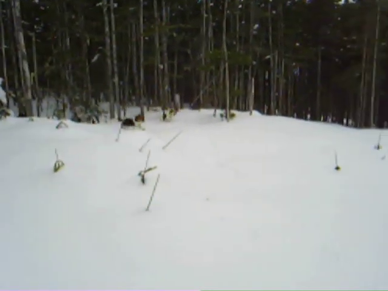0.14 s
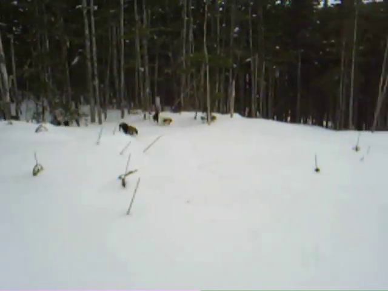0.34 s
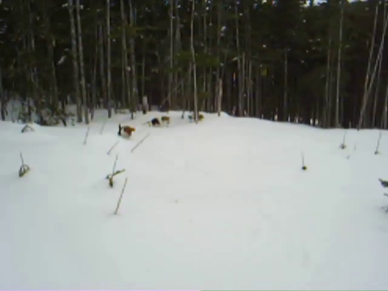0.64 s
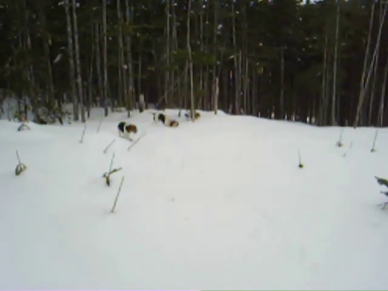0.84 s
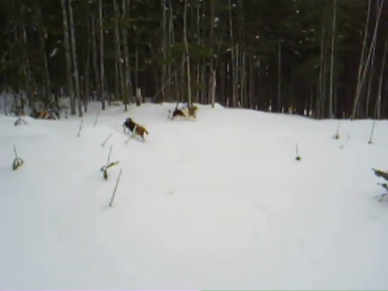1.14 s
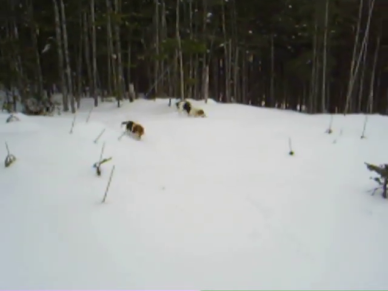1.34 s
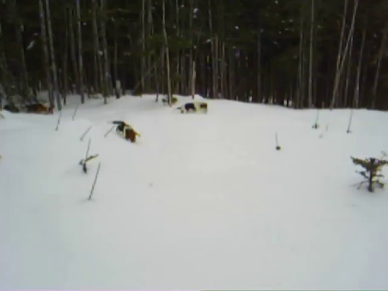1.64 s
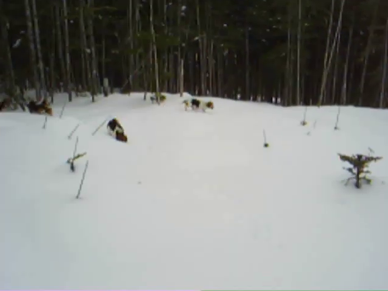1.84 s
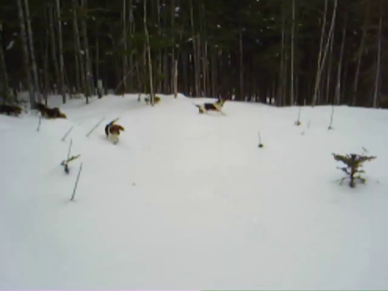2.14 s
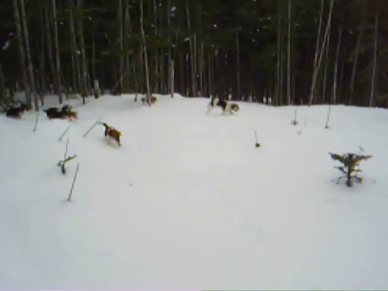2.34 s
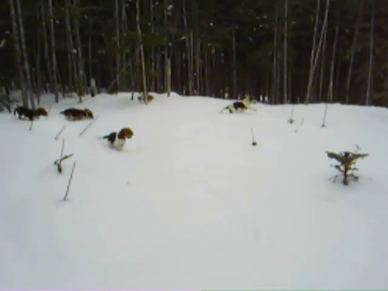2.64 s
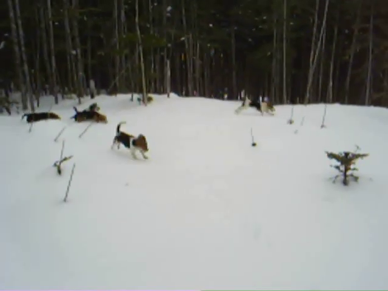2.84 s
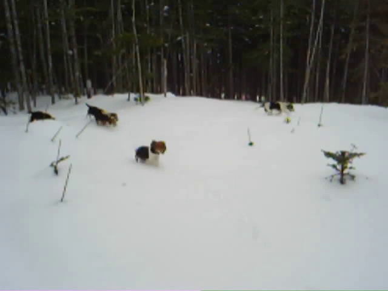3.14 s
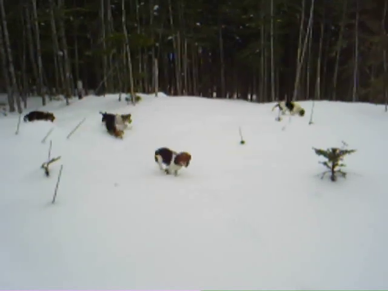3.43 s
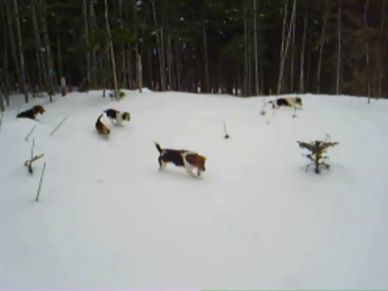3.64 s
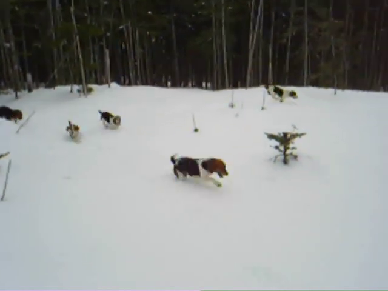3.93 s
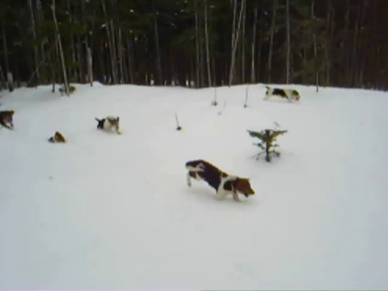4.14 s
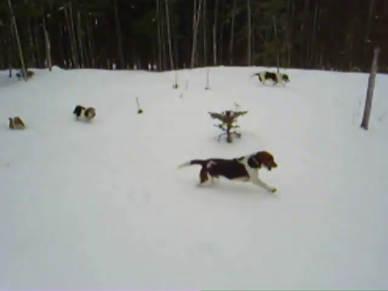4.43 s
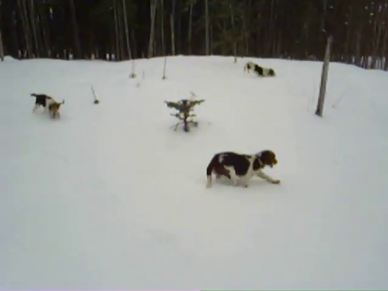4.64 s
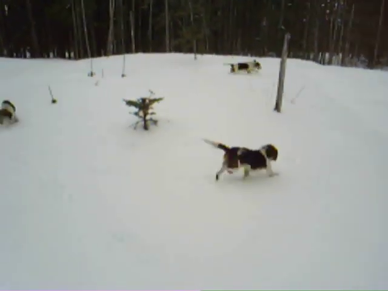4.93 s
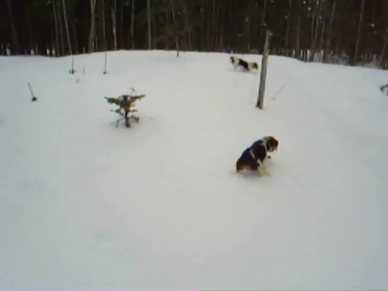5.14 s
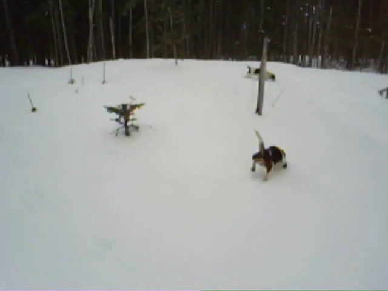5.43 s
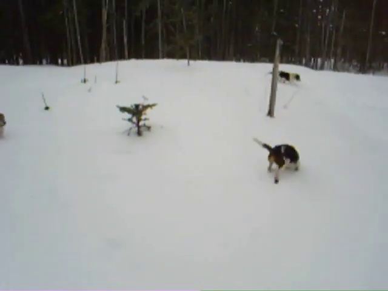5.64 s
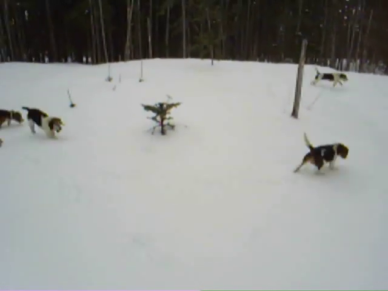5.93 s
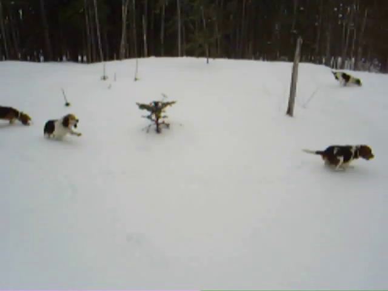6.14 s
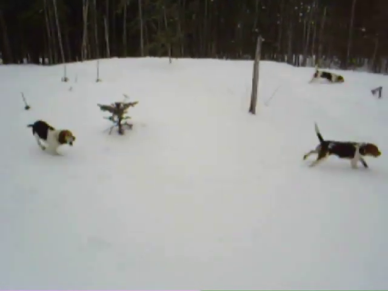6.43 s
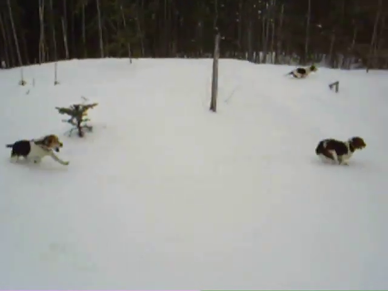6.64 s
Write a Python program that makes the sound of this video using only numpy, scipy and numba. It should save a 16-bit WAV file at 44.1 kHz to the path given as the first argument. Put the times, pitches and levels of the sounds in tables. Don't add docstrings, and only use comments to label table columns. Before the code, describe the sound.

Several hounds bay in quick repeated notes: clear high yelps drop into hoarse, rasping chest roars, mixed with round hoots and held howls. Trees return a short, faint echo. After about five seconds they pause, leaving soft paw crunches in snow and a thin far whine, then a lone, nearly pure howl rises. The sound is thin, bassless and gritty, from a cheap small camera with faint hiss.

```python
import sys
import numpy as np
from scipy import signal
from scipy.fft import rfft, irfft
from scipy.io import wavfile
from scipy.ndimage import uniform_filter1d
from numba import njit

SR = 44100
rng = np.random.default_rng(int(sys.argv[2]) if len(sys.argv) > 2 else 0)


def how_loud(loudness_db):
    steps = np.asarray(loudness_db, float) / 20
    return 10 ** steps


def generate_wav(signal):
    frames = np.transpose(np.atleast_2d(signal))
    scaled = np.clip(frames, -1, 1) * 32767
    pcm = np.round(scaled).astype(np.int16)
    wavfile.write(sys.argv[1], SR, pcm)


N = 298557

CLEAR, HUSKY, GRUFF, RASPING = .05, .15, .3, .33


def rms_one(x):
    return x / np.sqrt(np.mean(x ** 2) + 1e-20)


def span(rows, fade_s=.004):
    s, *columns = np.transpose(rows)
    at = np.arange(max(int((s[0] - fade_s) * SR), 0), min(int((s[-1] + fade_s) * SR), N))
    t = at / SR
    fade = np.clip(np.minimum(t - s[0], s[-1] + fade_s - t) / (2 * fade_s), 0, 1)
    return at, [np.interp(t, s, c) for c in columns], np.sin(fade * np.pi / 2) ** 2


def wobble(size, rate_hz):
    r = np.exp(-2 * np.pi * rate_hz / SR)
    white = rng.standard_normal((2, size + 2000))
    slow = signal.lfilter([1], [1, -2 * r, r * r], white)[:, 2000:]
    spread = np.sqrt((1 + r * r) / (1 - r * r) ** 3 * 2)
    return (slow[0] + 1j * slow[1]) / spread


def looped_wobble(size, rate_hz):
    return wobble(8000, rate_hz)[np.arange(size) % 8000]


def resonance(x, hz, width_hz):
    r = np.exp(-np.pi * width_hz / SR)
    poles = [1, -2 * r * np.cos(2 * np.pi * hz / SR), r * r]
    return signal.lfilter(np.array([1, 0, -1]) * (1 - r * r) / 2, poles, x)


def glide(row, swell_db, top, hold, fade_db, late, arch):
    s, length, from_hz, to_hz, db = row
    u = np.linspace(0, 1, 12)
    hz = from_hz + (to_hz - from_hz) * u ** late + arch * from_hz * np.sin(np.pi * u)
    drop_db = np.interp(u, [0, top, max(hold, top), 1], [swell_db, 0, 0, fade_db])
    return np.transpose([s + length * u, hz, db - drop_db])


def muzzle_db(k, hz, open_db):
    peak_db = 9 * np.exp(-((k * hz - 2780) / 330) ** 2)
    treble_loss_db = .012 * np.maximum(k * hz - 3200, 0)
    return peak_db - 2 * (k > 1) - treble_loss_db + open_db * (0, -1, 1, 1)[k - 1]


def sing(contours, rough, upper_db):
    out = np.zeros(N)
    for rows in contours:
        at, (hz, level_db, *mouth), fade = span(rows)
        open_db = mouth[0] if mouth else 0
        hz = uniform_filter1d(hz, size=441, mode="nearest")
        unsteady = rough * looped_wobble(len(at), rate_hz=22) * np.sqrt(2)
        hz = hz * (1 + .05 * unsteady.real)
        level_db = level_db + 6 * unsteady.imag
        phase = 2 * np.pi * np.cumsum(hz) / SR
        effort_db = level_db - level_db.max()
        for k, part_db in enumerate([0, *upper_db], 1):
            smear = np.clip(rough * (1 + .45 * (k - 1)), 0, 1)
            shape = np.sqrt(1 - smear ** 2) + smear * looped_wobble(len(at), rate_hz=110)
            shape = shape / np.abs(shape) ** .4
            tone = np.real(shape * np.exp(1j * k * phase))
            total_db = level_db + part_db + muzzle_db(k, hz, open_db) + .4 * effort_db * (k > 1)
            out[at] -= np.sqrt(2) * how_loud(total_db) * fade * tone
    return out


# (frequency [Hz], level [dB per Hz])
AIR_SPECTRUM = [(18, -36.5), (30, -4.5), (135, -6.5), (204, -0.5), (525, -4), (1300, -3.5), (1380, -3),
                (1500, -5.5), (3640, -9), (4120, -16), (5360, -47), (9060, -120)]


def air():
    hz = np.fft.rfftfreq(N, 1 / SR) + 1
    at_hz, level_db = np.transpose(AIR_SPECTRUM)
    shape = how_loud(np.interp(np.log(hz), np.log(at_hz), level_db))
    hiss = rms_one(irfft(rfft(rng.standard_normal(N)) * shape, N))
    tone = np.sin(2 * np.pi * 1443 * np.arange(N) / SR)
    return how_loud(-46) * hiss + how_loud(-66) * tone


def roar_breath(s, length, db, open_db):
    close = min(.03, length / 2)
    return [(s, db - 5, open_db), (s + .22 * length, db, open_db),
            (s + length - close, db - 3.5, open_db), (s + length, db - 3.5 - 11, open_db)]


# (time [s], length [s], level [dB], mouth opening [dB])
ROARS = [(0, 0.056, -35, -2), (.2, 0.12, -33.5, 7), (0.352, .11, -22, -2.5), (0.806, .18, -21, -0.5),
         (1.33, .18, -22.5, -.5), (1.761, 0.098, -22.5, 0), (1.88, 0.13, -36.5, -0.5),
         (2.015, 0.15, -20.5, -0.5), (2.384, .13, -31, -1), (2.506, 0.16, -22.5, 0),
         (2.975, 0.12, -23.5, -1.5), (3.365, .07, -26, 0.5), (3.4, .285, -20, -1.5),
         (4.407, 0.053, -27, -1.5), (4.831, 0.13, -20, -.5), (6.031, 0.095, -25, 2), (6.3, 0.13, -23, .5),
         (6.705, 0.088, -27, 1.5)]
# (frequency [Hz], width [Hz], level [dB])
THROAT = [(630, 200, 8), (973, 160, 2.5), (1225.4, 160, 1), (1500, 130, -2.5), (1712, 130, 0),
          (2112, 270, -6), (3312, 900, -12.5)]


def roars():
    pulse_hz = 329.6 * np.exp(.3 * wobble(size=N, rate_hz=150).real * 1.4)
    cycles = np.cumsum(pulse_hz) / SR
    pulses = np.diff(np.floor(cycles), prepend=0) * how_loud(3.7 * rng.standard_normal(N))
    source = rms_one(pulses) + .4 * rng.standard_normal(N)
    bands = [(-1) ** k * how_loud(db) * rms_one(resonance(resonance(source, hz, width), hz, width))
             for k, (hz, width, db) in enumerate(THROAT)]
    chest, mouth = bands[0] + bands[1], sum(bands[2:])
    power = (chest + mouth) ** 2
    even = np.sqrt(uniform_filter1d(power, size=700) / np.mean(power)) ** .7
    chest, mouth = chest / even, mouth / even
    out = np.zeros(N)
    for row in ROARS:
        at, (level_db, open_db), fade = span(roar_breath(*row), fade_s=0.0065)
        voice = chest[at] * how_loud(-2 * open_db) + mouth[at] * how_loud(open_db)
        out[at] += fade * how_loud(level_db - 1.2 - 5.5) * voice
    return out


# (time [s], length [s], from [Hz], to [Hz], level [dB])
DARK_NOTES = [(0, .12, 610.2, 585.7, -23), (.335, .11, 606.6, 576.6, -10.5), (.435, .035, 586, 630, -18.5),
              (2.52, .105, 708.3, 543.6, -9), (2.615, .04, 561, 651, -18), (2.97, .09, 630, 559.2, -13),
              (3.055, .04, 569.7, 655, -19), (6.73, .04, 713.4, 598, -23)]


def dark_notes():
    contours = [glide(row, swell_db=9, top=.5, hold=.7, fade_db=10, late=.8, arch=.001) for row in DARK_NOTES]
    return sing(contours, GRUFF, [-10, -24, -30])


# (time [s], length [s], from [Hz], to [Hz], level [dB])
SQUEAL = (.052, .088, 2000, 1550, -18)


def squeal():
    contour = glide(SQUEAL, swell_db=11, top=.43, hold=.7, fade_db=8, late=1.5, arch=.09)
    return sing([contour], CLEAR, [-11, -34])


# (time [s], length [s], from [Hz], to [Hz], level [dB])
OPEN_NOTES = [(.14, 0.084, 691.7, 704, -26.5), (6.036, .04, 605.5, 655, -17),
              (6.315, .085, 556.4, 535.8, -24)]
# (time [s], pitch [Hz], first harmonic level [dB])
OPEN_BAY = [
    (1.26, 582, -31.5),
    (1.291, 620.7, -21.5),
    (1.304, 702.4, -21),
    (1.34, 686.6, -16),
    (1.369, 726.6, -21),
]


def open_notes():
    contours = [glide(row, swell_db=8.8, top=.26, hold=.7, fade_db=8, late=.8, arch=.0012) for row in OPEN_NOTES]
    return sing(contours + [OPEN_BAY], HUSKY, [6, -3, -13])


# (time [s], length [s], from [Hz], to [Hz], level [dB])
HOARSE_NOTES = [(.14, .12, 2062, 2079, -26.5), (.82, 0.046, 1127, 1074, -18.5),
                (.385, 0.051, 1176, 1035, -19.5), (.895, 0.062, 1096, 1054, -15.5),
                (.97, 0.051, 1138, 1248, -27.5), (1.4, .09, 1160, 1032, -20), (2.02, .045, 773, 757, -15),
                (2.397, .083, 1221, 1282, -17), (3.4, .115, 650, 693.7, -15), (3.53, .055, 671, 661, -16),
                (3.595, .09, 680, 700, -17), (3.43, 0.11, 1770, 1700, -28.5), (3.52, .16, 1530, 1587, -28),
                (3.52, .15, 936.6, 994.5, -14), (4.38, .055, 780, 724.7, -22),
                (4.835, 0.1, 692.3, 650, -17), (4.845, .095, 972, 1002, -13),
                (4.86, 0.071, 1720, 1650, -23.5), (6.085, .05, 1076, 1105, -13.5),
                (6.52, 0.049, 866.6, 765.5, -20.5), (4.39, .05, 1800, 1748, -25.5)]


def hoarse_notes():
    contours = [glide(row, swell_db=4, top=.3, hold=.76, fade_db=5.4, late=1.1, arch=.001) for row in HOARSE_NOTES]
    return sing(contours, RASPING, [-24.5])


# (time [s], length [s], from [Hz], to [Hz], level [dB])
ARCHED_YELPS = [(.2, .06, 1500, 1850, -23), (.775, 0.051, 1270, 1280, -17.5),
                (1.705, .07, 1378, 1400, -16.5), (2.48, .055, 1270, 1165, -15)]


def arched_yelps():
    contours = [glide(row, swell_db=11, top=.43, hold=.7, fade_db=8, late=1.5, arch=.09) for row in ARCHED_YELPS]
    return sing(contours, CLEAR, [-7.5])


# (time [s], length [s], from [Hz], to [Hz], level [dB])
YELPS = [(.307, .078, 1270, 1059, -13.5), (1.997, .028, 1450, 1368, -26.5),
         (2.14, 0.032, 1122, 860.5, -15.5), (2.342, .068, 1037, 786.4, -9), (2.935, .07, 1290, 1109, -11.5),
         (3.357, .043, 948.6, 771.6, -22.5), (4.803, .047, 1395, 1095, -10),
         (6.268, 0.047, 1409, 1265, -21)]


def yelps():
    contours = [glide(row, swell_db=10, top=.45, hold=.7, fade_db=8.2, late=2.5, arch=.03) for row in YELPS]
    return sing(contours, CLEAR, [-11, -34])


# (time [s], length [s], from [Hz], to [Hz], level [dB])
CHEST_NOTES = [(.81, 0.15, 595, 534.6, -13.5), (1.328, 0.083, 546.5, 524, -15),
               (1.39, .115, 567.8, 517.5, -15), (2.06, 0.098, 581.4, 539.6, -14),
               (1.757, .078, 590, 555, -15)]


def chest_notes():
    contours = [glide(row, swell_db=8, top=.35, hold=.55, fade_db=12, late=.7, arch=.001) for row in CHEST_NOTES]
    return sing(contours, GRUFF, [-3, -6, -14.5])


# (time [s], length [s], from [Hz], to [Hz], level [dB])
HOOTS = [(1.238, .032, 888.5, 797, -20), (1.82, .04, 1248, 1112, -13), (1.775, .03, 1394, 1394, -20),
         (3.0, .04, 1116, 997, -19), (4.94, 0.029, 1041, 1080, -15), (6.016, .026, 1051, 1077, -5.5),
         (6.66, .12, 1170, 1100, -7.5)]


def hoots():
    contours = [glide(row, swell_db=3, top=.2, hold=.75, fade_db=5, late=2.3, arch=.04) for row in HOOTS]
    return sing(contours, CLEAR, [-26])


# (time [s], pitch [Hz], first harmonic level [dB])
HOWL_1 = [
    (1.835, 622.6, -32),
    (1.867, 673, -14),
    (1.925, 687.8, -14.5),
    (1.947, 780.3, -13.5),
    (1.971, 691.6, -22.5),
    (2.015, 682.3, -24.5),
]
HOWL_2 = [
    (2.41, 638.3, -22.5),
    (2.43, 644.8, -16.5),
    (2.44, 728.7, -11),
    (2.498, 814.5, -14.5),
    (2.53, 658, -19.5),
]
HOWL_3 = [
    (3.67, 1014, -12),
    (3.684, 1041, -15.5),
    (3.788, 1125, -10),
    (3.854, 1067, -12),
    (3.902, 1067, -12),
    (3.932, 1114, -12),
    (3.96, 1238, -15),
    (3.975, 1222, -25),
]
HOWL_4 = [
    (4.287, 1511, -22.5),
    (4.293, 1476, -9),
    (4.329, 1103, -10.5),
    (4.353, 1074, -8),
    (4.413, 1011, -10),
    (4.441, 1126, -12.5),
    (4.473, 1163, -19.5),
    (4.48, 1121, -25),
]


def held_howls():
    howls = sing([HOWL_1, HOWL_2, HOWL_3, HOWL_4], CLEAR, [-12.5, -34])
    halved = [(s, hz / 2, db - 27.5) for s, hz, db in HOWL_4[2:6]]
    return howls + sing([halved], HUSKY, [-31, 13, -29])


# (time [s], length [s], from [Hz], to [Hz], level [dB])
WHINES = [(4.262, .018, 2332, 2205, -35.5), (4.775, .023, 2110, 2257, -34), (5.525, 0.017, 863, 986, -40),
          (5.76, .03, 3250, 2426, -54), (5.875, .02, 942, 1185, -35.5)]
# (time [s], pitch [Hz], first harmonic level [dB])
FAR_WHINE = [
    (5.54, 1998, -42.5),
    (5.566, 1780, -44),
    (5.602, 2450, -48.5),
    (5.63, 2786, -51),
    (5.65, 2670, -53),
    (5.666, 2576, -38.5),
    (5.685, 1675, -54.5),
]


def whines():
    contours = [glide(row, swell_db=4, top=.4, hold=.6, fade_db=8.2, late=1.3, arch=.00084) for row in WHINES]
    return sing(contours + [FAR_WHINE], CLEAR, [-21.5])


# (time [s], peak level [dB])
STEPS = [(5.429, -41.5), (5.528, -44.5), (5.666, -35), (5.821, -31), (5.879, -37.5)]


def steps():
    blows = np.zeros(N)
    for s, peak_db in STEPS:
        blows[int(s * SR)] = how_loud(peak_db - 8)
    decay = np.exp(-1 / (0.057 * SR))
    band = signal.butter(1, [200, 1800], "band", fs=SR, output="sos")
    crunch = signal.sosfilt(band, rng.standard_normal(N))
    return signal.lfilter([1], [1, -decay], blows) * rms_one(crunch)


# (time [s], pitch [Hz], first harmonic level [dB], mouth opening [dB])
LONE_HOWL = [
    (6.06, 652.5, -14, -3.5),
    (6.088, 731.7, -9.5, -5.5),
    (6.26, 739.3, -5.5, -5),
    (6.4, 725.7, -12.5, 3),
    (6.498, 719.7, -11, 6.5),
    (6.545, 665, -14, 10.5),
    (6.6, 693, -10, 8),
    (6.63, 786, -6.5, -8),
    (6.662, 869, -12, -12),
]


def lone_howl():
    return sing([LONE_HOWL], CLEAR, [-27, -30, -41.5])


def wood(x):
    t60_s, gap_s, cut_hz = 0.71, .03, 2300
    t = np.arange(SR) / SR
    echoes = rng.standard_normal(SR) * how_loud(-60 * t / t60_s) * np.clip(t / gap_s, 0, 1) ** 2
    echoes = signal.sosfilt(signal.butter(1, cut_hz, fs=SR, output="sos"), echoes)
    return signal.fftconvolve(x, echoes / np.sqrt(np.sum(echoes ** 2)))[:N]


def scene():
    pack = (roars() + dark_notes() + squeal() + open_notes() + hoarse_notes() + arched_yelps() + yelps()
            + chest_notes() + hoots() + held_howls() + whines() + lone_howl())
    thin = signal.butter(5, 477.8, "high", fs=SR, output="sos")
    return (signal.sosfiltfilt(thin, pack + how_loud(-22.5) * wood(pack)) + steps() + air())[None]


STORE_SR, BLOCK, FIRST_BLOCK_S = 8000, 1017, .1026


@njit
def adaptive_4bit(x, start, block):
    out, guess, index = np.zeros(len(x)), 0., 20
    for i in range(len(x)):
        step = 7 / 32768 * 1.1 ** index
        if (i - start) % block == 0:
            guess = x[i]
        else:
            size = min(int(abs(x[i] - guess) / step * 4), 7)
            guess += np.sign(x[i] - guess) * (size + .5) * step / 4
            index = min(max(index + (-1 if size < 4 else 2 * size - 6), 0), 88)
        out[i] = guess
    return out


def zero_line(low):
    share, knee, steep, most, lag = 0.053, .59, 1.4, 0.095, 45
    lead = BLOCK - round(FIRST_BLOCK_S * STORE_SR)
    blocks = np.pad(np.abs(low), (lead, -(len(low) + lead) % BLOCK)).reshape(-1, BLOCK)
    swing = np.maximum.accumulate(blocks, axis=1)
    swing = np.maximum(swing, swing[:, 24:25])
    slip = np.minimum(share * swing + steep * np.maximum(swing - knee, 0), most)
    r = np.exp(-1 / lag)
    slip = signal.lfilter([1 - r], [1, -r], slip - slip[:, :1], axis=1) + slip[:, :1]
    return -uniform_filter1d(slip.ravel(), size=5)[lead:lead + len(low)]


def roll_off(x):
    return signal.sosfilt(signal.butter(12, 15870, fs=SR, output="sos"), x)


def record(dry):
    dull = signal.sosfiltfilt(signal.butter(4, 4262, fs=SR, output="sos"), dry[0])
    low = np.interp(np.arange(0, N, SR / STORE_SR), np.arange(N), dull)
    low = adaptive_4bit(low, round(FIRST_BLOCK_S * STORE_SR), BLOCK) + zero_line(low)
    low = np.clip(low, -.68, .68)
    held = np.zeros(len(low) * 6)
    held[::6] = 6 * low
    smoother = signal.cheby2(14, 52, 4660, fs=STORE_SR * 6, output="sos")
    up = signal.resample_poly(signal.sosfiltfilt(smoother, held), 147, 160)[:N]
    up = np.pad(up, (0, N - len(up)))
    return roll_off(np.clip(up, -.71, .71)[None])


dry = scene()
out = record(dry)
generate_wav(out)
```